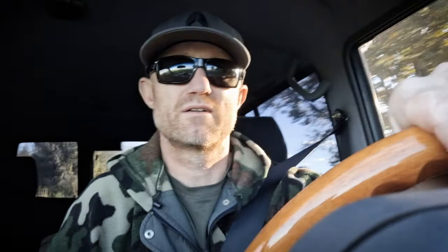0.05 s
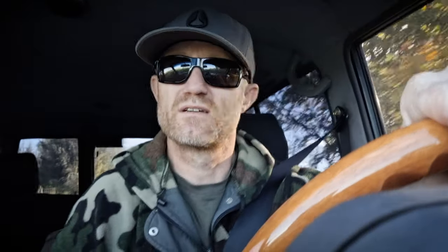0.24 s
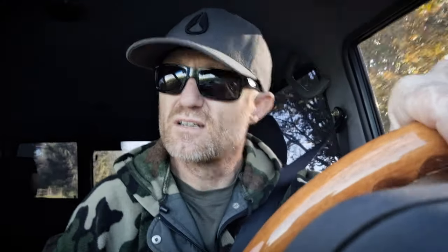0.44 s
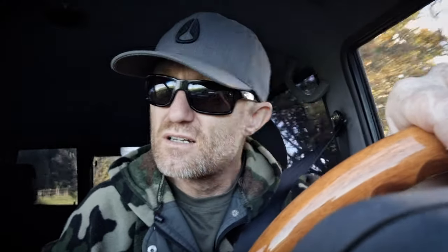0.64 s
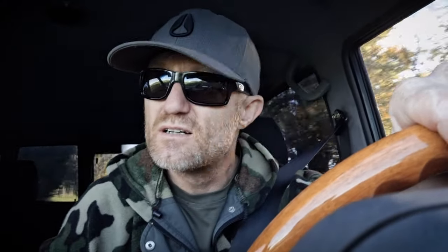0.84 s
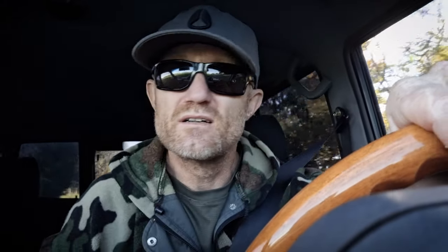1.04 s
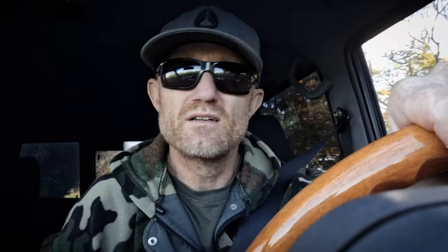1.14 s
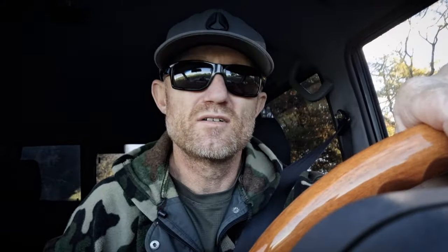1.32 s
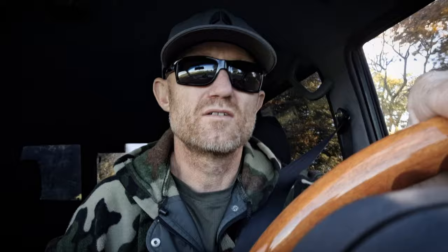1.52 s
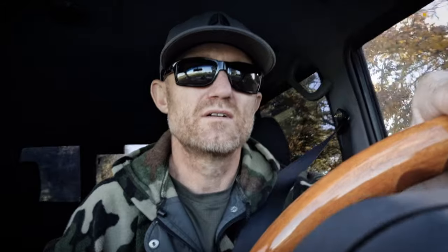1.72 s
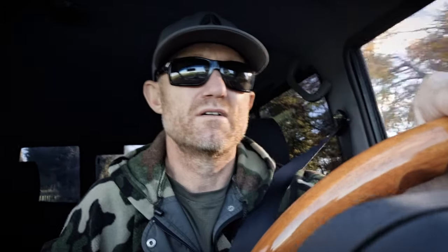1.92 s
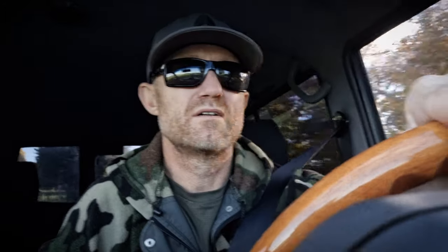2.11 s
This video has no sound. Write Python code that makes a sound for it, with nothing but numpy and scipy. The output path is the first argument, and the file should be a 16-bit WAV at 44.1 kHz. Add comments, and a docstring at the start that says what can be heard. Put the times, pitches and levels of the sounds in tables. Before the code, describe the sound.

Steady engine hum and deep road rumble inside a closed, moving vehicle, for about 2.2 seconds. Bass dominates, with body boom pulsing over small bumps, a wavering low drone and a muffled tyre roar under barely audible air hiss. A small hard click snaps on the right at 0.33 s with tiny bounces; faint trim ticks at 0.04 and 2.06 s. The engine note swells around 0.5-0.9 s and most near 2 s. Dashboard stereo.

```python
"""Inside the closed cab of a vehicle cruising at an even speed, heard by two microphones on the dashboard.
The engine hums as sines on a few orders of one shaft, over shaped noise for body boom and panel rumble.
Narrow noise bands ring in the tyres; broad noise makes a dull roar and a thin, fluttering air hiss.
A small hard part clicks on the right and bounces twice, as decaying modes with a noise echo.
Fainter ticks are short single rings, and the brushes are soft swells of high noise."""
import sys
import numpy as np
from scipy import signal
from scipy.fft import rfft, irfft
from scipy.io import wavfile
from scipy.ndimage import uniform_filter1d

SR = 44100
rng = np.random.default_rng(int(sys.argv[2]) if len(sys.argv) > 2 else 0)


def store_pcm(level_fs):
    """Save levels as 16-bit WAV."""
    pcm = np.round(np.clip(level_fs, -1, 1) * 32767).astype(np.int16)
    wavfile.write(sys.argv[1], SR, np.atleast_2d(pcm).T)


N = 95432
T, HZ = np.arange(N) / SR, np.fft.rfftfreq(N, 1 / SR)


def amp(db):
    """Decibels to gain."""
    return 10 ** (np.asarray(db) / 20)


def unit(x):
    """Scales to rms 1 over all channels together."""
    return x / np.sqrt(np.mean(x ** 2) + 1e-30)


def over_hz(points):
    """Reads a table along log frequency."""
    f, value = np.transpose(points)
    return np.interp(np.log(HZ + 1), np.log(f + 1), value)


def level(points):
    """Reads a table of dB over time as a gain."""
    return amp(np.interp(T, *np.transpose(points)))


def pan(db):
    """Left and right gains of mean power 1; positive dB leans left."""
    gains = amp(np.array([np.atleast_1d(db), -np.atleast_1d(db)]) / 2)
    return gains / np.sqrt(np.mean(gains ** 2, 0))


def shaped(noise, gain):
    """Filters noise by a gain for each frequency and scales it to rms 1."""
    return unit(irfft(rfft(noise) * gain, N))


def drift(rate_hz):
    """Slow random motion of rms 1: noise that fades out above the rate."""
    return shaped(rng.standard_normal(N), np.exp(-(HZ / rate_hz) ** 2) * (HZ > 0))


def steadied(x, size):
    """Evens out the chance swells of a noise over a window of size samples."""
    power = uniform_filter1d(np.mean(x ** 2, 0), size)
    return x / np.sqrt(power + 1e-20)


# Likeness of the two microphones, negative where they oppose: (frequency [Hz], correlation [-1 to 1])
MIC_LIKENESS = [(30, .99), (60, .975), (120, .975), (240, .96), (330, .7), (500, .4), (700, -.05),
                (1300, -.55), (2000, -.3), (3100, 0), (15000, .05)]
# Balance of the microphone pair: (frequency [Hz], left-right [dB])
MIC_BALANCE = [(30, -3.5), (60, -5), (110, -1), (240, -1), (400, -0.5), (600, -2.5), (1000, 0.5),
               (1400, -3), (2200, 1.5), (4000, 2), (6000, 5.5), (8200, 2.5), (10000, 9), (13000, 12)]
# The bass reaches the left microphone first: (frequency [Hz], phase lead [rad])
LEFT_LEAD = [(30, .42), (50, .45), (64, .62), (90, .3), (150, .25), (200, .05), (500, 0)]


def cab_noise(gain):
    """Noise at the dashboard pair: shared in the bass, partly opposed in the mids, diffuse in the treble."""
    common, separate = np.exp(2j * np.pi * rng.random((2, len(HZ))))
    likeness = np.clip(over_hz(MIC_LIKENESS), -1, 1)
    left = common * np.exp(1j * over_hz(LEFT_LEAD))
    right = likeness * common + np.sqrt(1 - likeness ** 2) * separate
    return unit(irfft(np.array([left, right]) * gain * pan(over_hz(MIC_BALANCE)), N))


SHAFT_HZ, SPEED_WANDER = 32.35, 0.003  # mean turns per second; rms wander as a fraction
FIRING_ORDER, FIRING_PAN_DB = 2, -3.5
DRONE_ORDER, DRONE_PAN_DB = 7, -0.7


def shaft_tone(turns, order, waver_db, pan_db):
    """One order of the shaft: a sine locked to its turns, wavering in level, the left phase leading."""
    lead = np.array([[np.interp(order * SHAFT_HZ, HZ, over_hz(LEFT_LEAD))], [0]])
    sine = np.sqrt(2) * np.sin(2 * np.pi * (order * turns + rng.random()) + lead)
    waver = unit(amp(waver_db * drift(rate_hz=9.8)))
    return sine * waver * pan(pan_db)


# Firing note over time: (time [s], level [dB rms])
FIRING_LEVEL = [(0, -51), (.35, -48), (.52, -43.5), (.85, -43), (1.15, -53), (1.48, -55), (1.65, -47.5),
                (1.97, -37.5), (2.16, -44)]
# Drone that the cab favours, over time: (time [s], level [dB rms])
DRONE_LEVEL = [(0, -60.5), (.1, -51), (.2, -60), (.27, -53), (.36, -58), (.5, -58.5), (.59, -43.5),
               (.68, -51), (.76, -42), (.88, -51), (1.02, -57.5), (1.1, -47.5), (1.21, -56), (1.27, -48.5),
               (1.35, -54), (1.44, -44.5), (1.6, -48.5), (1.69, -55), (1.78, -44), (1.87, -53.5),
               (1.95, -43), (2.03, -57.5), (2.11, -45), (2.16, -70)]
# Other engine orders: (multiple of shaft speed, level [dB rms], waver [dB rms], left-right [dB])
OTHER_ORDERS = [(4, -56, 0.5, -2.7), (6, -61, 2, 5.3), (10, -66, 5.5, 0)]


def engine():
    """Orders of one turning shaft wander together; the firing note and a drone the cab favours stand out."""
    turns = np.cumsum(SHAFT_HZ * (1 + SPEED_WANDER * drift(rate_hz=2.5))) / SR
    out = level(FIRING_LEVEL) * shaft_tone(turns, FIRING_ORDER, 0, FIRING_PAN_DB)
    out += level(DRONE_LEVEL) * shaft_tone(turns, DRONE_ORDER, 1.5, DRONE_PAN_DB)
    for order, db, waver_db, pan_db in OTHER_ORDERS:
        out += amp(db) * shaft_tone(turns, round(order), waver_db, pan_db)
    return out


# Boom of the body: (frequency [Hz], spectral density [dB per Hz, relative])
BOOM_COLOUR = [(12, -42.5), (20, -36.5), (29, -18), (39, 3.5), (48, 1.5), (58, 0), (78, -9), (100, -16),
               (140, -34.5), (180, -45.5), (400, -92)]
# Boom over the bumps: (time [s], level [dB rms])
BOOM_OVER_BUMPS = [(0, -35.5), (.04, -40), (.075, -32), (.12, -37.5), (.185, -35), (.24, -40), (.295, -33),
                   (.35, -39.5), (.44, -41), (.51, -36.5), (.56, -39.5), (.66, -38), (.78, -45.5),
                   (.84, -41.5), (.9, -39), (.96, -39), (1.1, -41.5), (1.18, -37.5), (1.245, -49),
                   (1.315, -34.5), (1.36, -44.5), (1.46, -40), (1.61, -38.5), (1.72, -39.5), (1.77, -33),
                   (1.85, -42), (1.95, -37), (2.03, -42), (2.09, -36.5), (2.16, -31)]
# Even rumble of the panels: (frequency [Hz], spectral density [dB per Hz, relative])
RUMBLE_COLOUR = [(30, -20), (80, -1), (105, -1), (125, -3.5), (150, -3.5), (172, -11.5), (200, -15),
                 (260, -12), (280, -5), (297, -14), (370, -12.5), (420, -17.5), (600, -35.5), (900, -64.5)]
RUMBLE_DB = -50.5  # rms
# Air ringing inside the tyres: (frequency [Hz], half-width at half amplitude [Hz], level [dB rms])
TYRE_RINGS = [(197.9, 7.6, -58.5), (220.9, 6, -57), (245.5, 4.6, -56)]


def road():
    """Bumps make the body boom, the panels rumble evenly, and the air in the tyres rings in narrow bands."""
    boom = level(BOOM_OVER_BUMPS) * steadied(cab_noise(amp(over_hz(BOOM_COLOUR))), size=3000)
    out = boom + amp(RUMBLE_DB) * cab_noise(amp(over_hz(RUMBLE_COLOUR)))
    for hz, width_hz, db in TYRE_RINGS:
        resonance = 1 / (1 + ((HZ - hz) / width_hz) ** 2)
        out += amp(db) * cab_noise(resonance)
    return out


# A click and its two bounces: (time [s], level before the mode and echo levels [dB])
CLICK_TIMES = [(0.3327, -46.5), (.3579, -65), (.3672, -70)]
# Ringing of the part: (frequency [Hz], level relative to the click [dB], t60 [s])
PART_MODES = [(2400, -5, .002), (4600, -4.5, 0.0022), (7940, -2, 0.0023), (9800, -9.5, 0.0025),
              (12600, -5, .003), (14500, -10, 0.0027)]
# Colour of the click's echo: (frequency [Hz], spectral density [dB per Hz, relative])
ECHO_COLOUR = [(500, -23), (2500, 3), (4200, -1.5), (5800, -6.5), (8000, -3), (10000, -6.5), (12200, 3.5),
               (15000, -1)]
# Near to far surfaces: (level relative to the click [dB], time to fall to 1/e [s])
ECHO_STAGES = [(-26, 0.0045), (-20, 0.012), (-35.5, 0.091)]
CLICK_PAN_DB = -29  # far to the right


def latch():
    """A small hard part snaps on the right and bounces twice; the cab scatters a short, bright echo."""
    scatter = shaped(rng.standard_normal((2, N)), amp(over_hz(ECHO_COLOUR)))
    out = np.zeros((2, N))
    for s, db in CLICK_TIMES:
        age = np.maximum(T - s, 0)
        ring = sum(amp(mode_db - 60 * age / t60) * np.sin(2 * np.pi * hz * age)
                   for hz, mode_db, t60 in PART_MODES)
        echo = sum(amp(echo_db) * np.exp(-age / decay_s) for echo_db, decay_s in ECHO_STAGES)
        out += amp(db) * (T >= s) * (pan(CLICK_PAN_DB) * ring + echo * scatter)
    return out


# Roar of tread and air: (frequency [Hz], spectral density [dB per Hz, relative])
ROAR_COLOUR = [(100, -24), (300, -0.5), (430, -0.5), (520, -2), (590, 0.5), (720, -4), (870, -9),
               (1080, -9), (1330, -13.5), (1650, -13.5), (1950, -20), (2600, -26), (3300, -31), (4800, -36),
               (7000, -48), (16000, -74.5)]
# Roar over time, before flutter: (time [s], level [dB rms])
ROAR_OVER_TIME = [(0, -58.5), (.05, -59.3), (.14, -61.5), (.3, -59.2), (.42, -59.5), (.8, -61),
                  (1.15, -59.5), (1.45, -59), (1.6, -57.5), (1.8, -57.5), (2.16, -59)]
# Thin air hiss: (frequency [Hz], spectral density [dB per Hz, relative])
HISS_COLOUR = [(1000, -30), (3000, 1), (4700, 2.5), (5800, -1.5), (7800, -1), (8900, -7), (10500, -3.5),
               (12800, 1), (15000, -6), (16000, 1.5)]
# Hiss over time, before flutter: (time [s], level [dB rms])
HISS_OVER_TIME = [(0, -81), (.3, -83), (.45, -79.5), (.65, -82.5), (1, -83), (1.4, -80.5), (1.9, -78),
                  (2.16, -79)]
ROAR_FLUTTER_DB, HISS_FLUTTER_DB, FLUTTER_HZ = 0.7, 0.65, 45  # depths rms


def air():
    """Dull roar of tread and air under a thin hiss: two broad noises, each fluttering on its own."""
    roar = level(ROAR_OVER_TIME) * cab_noise(amp(over_hz(ROAR_COLOUR)))
    roar *= amp(ROAR_FLUTTER_DB * drift(FLUTTER_HZ))
    hiss = level(HISS_OVER_TIME) * cab_noise(amp(over_hz(HISS_COLOUR)))
    hiss *= amp(HISS_FLUTTER_DB * drift(FLUTTER_HZ))
    return roar + hiss


# Ticks of loose trim: (time [s], envelope peak before panning [dB], pitch [Hz],
# time from onset to envelope peak [s], left-right [dB])
TRIM_TICKS = [(0.0359, -60.5, 3680, 0.00029, 23), (0.0367, -63.5, 1100, .004, 6),
              (0.0367, -62, 2600, 0.00022, 20), (.2495, -70, 8000, .0002, 9), (.389, -70, 2920, .0008, 3),
              (2.0575, -69.5, 7900, 0.00023, 8)]


def ticks():
    """Faint dry ticks of loose trim, each one sine that swells and dies in a short ring."""
    out = np.zeros((2, N))
    for s, db, hz, ring_s, pan_db in TRIM_TICKS:
        age = np.maximum(T - s, 0)
        envelope = age / ring_s * np.exp(1 - age / ring_s)
        out += amp(db) * pan(pan_db) * envelope * np.sin(2 * np.pi * hz * age)
    return out


# Soft brushes: (time of peak [s], rms at the peak before panning [dB])
SOFT_BRUSHES = [(.026, -77), (.396, -69.5), (2.078, -77)]
BRUSH_S, BRUSH_HZ, BRUSH_OCTAVES, BRUSH_PAN_DB = 0.0054, 13600, 0.29, 16  # widths are Gaussian sigmas


def brushes():
    """Soft high brushes: bell-shaped swells of one noise band, unrelated left and right."""
    band = np.exp(-0.5 * (np.log2((HZ + 1) / BRUSH_HZ) / BRUSH_OCTAVES) ** 2)
    swell = sum(amp(db) * np.exp(-0.5 * ((T - s) / BRUSH_S) ** 2) for s, db in SOFT_BRUSHES)
    return swell * pan(BRUSH_PAN_DB) * shaped(rng.standard_normal((2, N)), band)


def scene():
    """Everything heard from the dashboard."""
    return engine() + road() + latch() + air() + ticks() + brushes()


EDGE_HZ = 15650


def record(dry):
    """The recorder's band limit: a steep low-pass, with the ends mirrored so that they stay intact."""
    taps = signal.firwin(511, EDGE_HZ, window=("kaiser", 9), fs=SR)
    padded = np.pad(dry, ((0, 0), (255, 255)), "reflect", reflect_type="odd")
    return signal.oaconvolve(padded, taps[None], "valid")


dry = scene()
out = record(dry)
store_pcm(out)
```